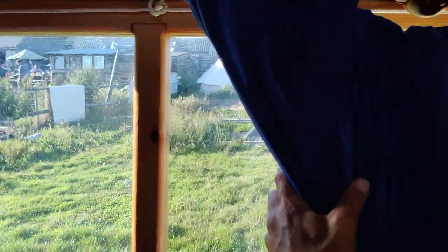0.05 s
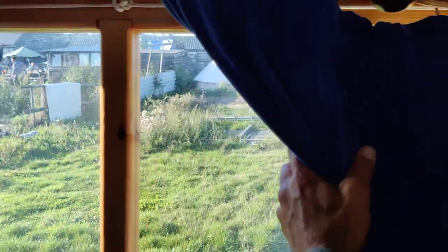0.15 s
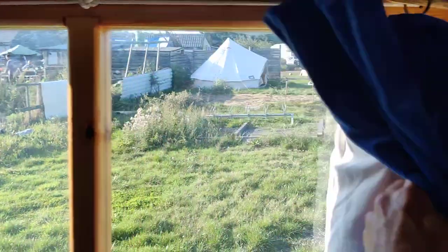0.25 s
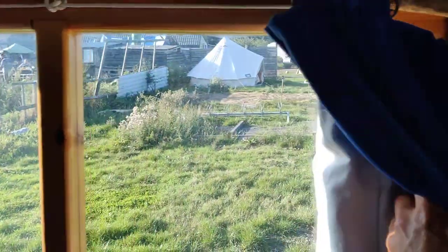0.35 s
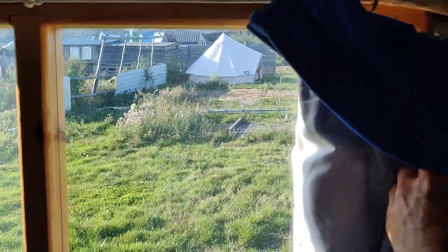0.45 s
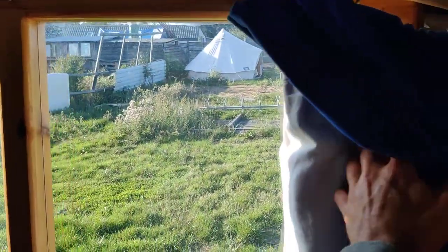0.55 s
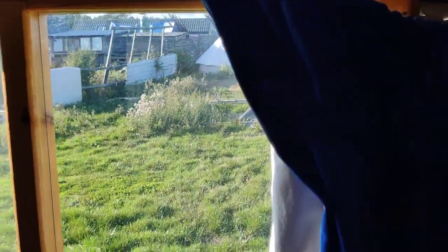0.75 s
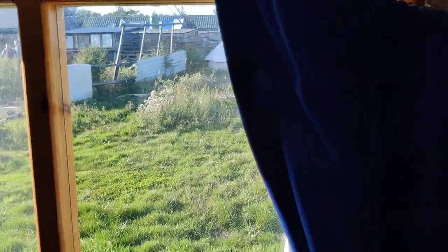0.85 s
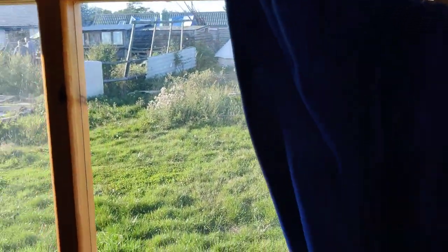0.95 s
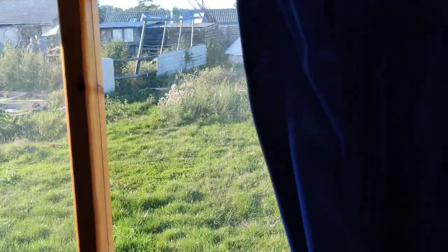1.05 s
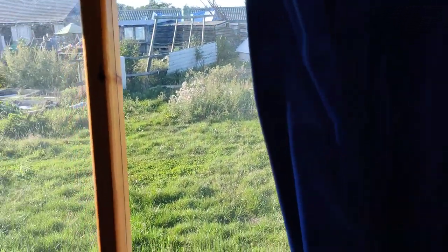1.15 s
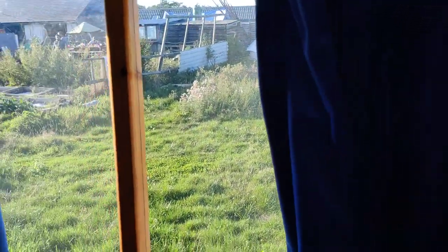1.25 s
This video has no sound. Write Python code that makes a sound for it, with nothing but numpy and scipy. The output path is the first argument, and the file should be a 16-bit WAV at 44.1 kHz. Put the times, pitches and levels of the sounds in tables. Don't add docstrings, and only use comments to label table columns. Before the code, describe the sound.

A curtain is tugged open, its metal hooks scraping and clashing sharply along a wooden pole

```python
import sys
import numpy as np
from scipy import signal
from scipy.fft import rfft, irfft
from scipy.io import wavfile
from scipy.ndimage import uniform_filter1d

SR = 44100
rng = np.random.default_rng(int(sys.argv[2]) if len(sys.argv) > 2 else 0)


def generate_wav(signal):
    frames = np.transpose(np.atleast_2d(signal))
    scaled = np.clip(frames, -1, 1) * 32767
    pcm = np.round(scaled).astype(np.int16)
    wavfile.write(sys.argv[1], SR, pcm)


def undo_db(level):
    steps = np.asarray(level, float) / 20
    return 10 ** steps


N = 57330

# frequency in Hz, level in dB, t60 in seconds.
HOOK_MODES = [(2157, -3, 0.016), (2876, -1, 0.011), (3123, -2.5, 0.011), (3570, 2, 0.016),
              (4042, -2.5, 0.017), (4470, -5.5, 0.016), (5440, -4, 0.016), (5870, -3, 0.0097),
              (6820, -2, 0.014), (7770, -9.5, 0.0043), (8500, -11, 0.018)]
# frequency in Hz, level in dB, t60 in seconds.
POLE_MODES = [(420, -2, 0.015), (701, -0.5, 0.027), (1069, -3, 0.035), (1244, -0.5, .025),
              (1460, -1.5, 0.028), (1802, 0, 0.011)]
# frequency in Hz, level in dB, t60 in seconds.
FRAME_MODES = [(40.3, -5.5, 0.091), (113, -6.5, 0.097), (137.7, -2, 0.14), (210, -10.5, 0.044),
               (436.7, 1, .06)]
BLOW_S = .05


def curve(table, index):
    rows = np.array(table, float)
    return undo_db(np.interp(np.arange(N) / SR, rows[:, 0], rows[:, index]))


def unit(x):
    return x / np.sqrt(np.mean(x ** 2))


def unit_energy(x):
    return x / np.sqrt(np.sum(x ** 2) / 2)


def colour(x, points):
    hz, db = np.array(points, float).T
    f_hz = np.maximum(np.arange(N // 2 + 1) * SR / N, 1)
    gain_db = np.interp(np.log(f_hz), np.log(hz), db, left=-60, right=-60)
    return unit(irfft(rfft(x) * undo_db(gain_db), N))


def walk(rate_hz):
    k = int(SR / rate_hz)
    steps = np.repeat(rng.standard_normal(N // k + 1), k)
    return unit(uniform_filter1d(uniform_filter1d(steps, k), k)[:N])


def ring(hz, t60_s, t, turn_rad=0):
    return np.sin(2 * np.pi * hz * t + turn_rad) * np.exp(-np.log(1000) * t / np.maximum(t60_s, .002))


def strike(modes, scatter_db, spread_rad, seconds=.12, contact_s=.0003, jitter=0.028):
    hz, db, t60_s = np.array(modes, float).T[:, :, None]
    chance = rng.standard_normal((4, len(modes), 1))
    t = np.arange(int(seconds * SR)) / SR
    gain = undo_db(db + scatter_db * chance[0])
    f_hz = np.minimum(hz * (1 + jitter * chance[1]), .45 * SR)
    turns_rad = spread_rad * np.minimum(hz / 1100, 1) ** 2 * chance[2:]
    ports = np.array([np.sum(gain * ring(f_hz, t60_s, t, turn), axis=0) for turn in turns_rad])
    return ports * np.minimum(t / contact_s, 1) ** 2


def add(out, x, start_s):
    i = max(int(start_s * SR), 0)
    n = min(x.shape[-1], N - i)
    out[:, i:i + n] += x[:, :n]


def pan(db):
    return undo_db(np.array([[db / 2], [-db / 2]]))


def still_air():
    # frequency in Hz, level in dB per Hz.
    air_spectrum = [(40, -9), (100, 4.5), (156, -7), (452, -24), (705, -25), (872, -33), (12100, -46),
                    (15000, -56.5)]
    noise = rng.standard_normal((2, N)) + 0.57 * rng.standard_normal(N)
    return undo_db(-76) * np.array([colour(port, air_spectrum) for port in noise])


def cloth():
    # time in seconds, rustle in dB, L-R in dB.
    cloth_motion = [(0, -90, -2.5), (.095, -81.5, 10.5), (.112, -66, -9), (.14, -77.5, 8), (.208, -68, 6),
                    (.232, -53, 11), (.37, -53, 1), (.41, -64, 0.5), (.52, -72, 2), (.68, -74.5, 3.5),
                    (.8, -71, 3), (.89, -73.5, 2.5), (.925, -75.5, 4), (.96, -82.5, 1), (1.1, -89, 0),
                    (1.255, -89, -1), (1.272, -81.5, 3), (1.3, -80.5, -6)]
    # frequency in Hz, level in dB per Hz.
    rustle_spectrum = [(210, -35.5), (350, -8), (438, -7.5), (593, -2.5), (1180, -8), (1280, -5),
                       (1380, -9), (4520, -12.5), (16000, -25.5)]
    mid, side = rng.standard_normal((2, N))
    sign = np.array([[1], [-1]])
    fibres = 1 + 2.8 * (rng.random(N) < .01)
    hiss = colour(mid * fibres, rustle_spectrum) + 0.98 * sign * colour(side * fibres, rustle_spectrum)
    hiss = hiss * undo_db(1.1 * walk(28) + 3.0)
    return hiss * curve(cloth_motion, index=1) * curve(cloth_motion, index=2) ** (sign / 2)


def rumble():
    # time in seconds, level in dB, L-R in dB.
    sway_motion = [(0.0, -67, 4), (0.166, -51.5, 3.5), (0.238, -35.5, 3.5), (0.314, -34, 6), (0.34, -39, 4),
                   (0.372, -34.5, -5), (0.39, -34, 2), (0.44, -40, 0.5), (0.514, -48.5, -3),
                   (0.662, -48.5, -3), (0.814, -51.5, -2), (0.84, -52.5, 3), (0.904, -53.5, -0.5),
                   (1.028, -60.5, -2.5), (1.136, -62, 4.5), (1.222, -69.5, 2), (1.27, -52.5, 3),
                   (1.3, -56, 3)]
    # frequency in Hz, level in dB per Hz.
    rumble_spectrum = [(12, -26.5), (20, 1), (52, 0), (105, -15.5), (203, -22.5), (437, -30), (500, -31),
                       (650, -48.5), (1100, -120)]
    mid, side = rng.standard_normal((2, N))
    sign = np.array([[1], [-1]])
    deep = (colour(mid, rumble_spectrum) + 0.069 * sign * colour(side, rumble_spectrum)) * undo_db(-0.86)
    return deep * curve(sway_motion, index=1) * curve(sway_motion, index=2) ** (sign / 2)


def drag(slip_rate_hz=2000.0):
    # start in seconds, end in seconds, level in dB.
    drag_stages = [
        (.074, .104, -79),
        (.104, .113, -64),
        (.113, .127, -57),
        (.127, .218, -59),
        (.219, .25, -46),
        (.25, .372, -41),
        (.372, .39, -56),
    ]
    edge_s = .005
    t = np.arange(N) / SR
    effort = sum(undo_db(db) * (t > start_s) * (t <= end_s) for start_s, end_s, db in drag_stages)
    effort = uniform_filter1d(effort, int(edge_s * SR))

    chance = rng.random((3, N))
    slips = (chance[0] < slip_rate_hz / SR) * undo_db(-3. * np.log(chance[1] + .02)) * np.sign(chance[2] - .5)
    slips = unit(slips) * undo_db(3.0 * walk(90)) * effort

    t_body = t[:int(.12 * SR)]
    wood = unit_energy(strike(POLE_MODES, 3.2, 1.0) * np.exp(-t_body / 0.0019))
    metal = unit_energy(strike(HOOK_MODES, 2., 1.3) * np.exp(-t_body / 0.00051))
    frame = unit_energy(strike(FRAME_MODES, 2., .3))
    body = wood + undo_db(-15.0) * metal + undo_db(1.5) * frame
    return signal.fftconvolve(slips[None], body, axes=1)[:, :N] * pan(2.0)


def room(x):
    t60_s, level_db, dull_hz = 0.095, -17, 2900
    t = np.arange(int(.3 * SR)) / SR
    tail = rng.standard_normal((2, len(t))) * np.exp(-np.log(1000) * t / t60_s) * np.minimum(t / 0.001, 1)
    tail = signal.lfilter(*signal.butter(1, dull_hz, fs=SR), tail)
    tail = tail / np.sqrt(np.sum(tail[0] ** 2))
    return undo_db(level_db) * signal.fftconvolve(x.mean(axis=0)[None], tail, axes=1)[:, :N]


def tugs():
    # start in seconds, level in dB.
    tug_events = [
        (0.076, -63.5),
        (.118, -43.5),
        (.222, -33.5),
        (0.233, -32.5),
        (0.263, -27),
        (.298, -29),
        (0.367, -38),
        (1.261, -76),
    ]
    out = np.zeros((2, N))
    for start_s, db in tug_events:
        add(out, undo_db(db) * strike(FRAME_MODES, 6.2, .25, seconds=0.39), start_s)
    return uniform_filter1d(out, size=30) * pan(3.1)


def blows(count=3):
    # start in seconds, peak in dB, brightness in dB per octave, wire ring in dB, pole knock in dB.
    clash_events = [(0.253, -15.5, -6, -23, 1), (.2560, -18, -6.5, -22, -3), (.2676, -20, -2.5, -13.5, 4.5),
                    (.2708, -28, -2, -17, 6), (0.2766, -21.5, -3, -13, 5.5), (.2800, -26, -3.5, -17.5, 5),
                    (0.287, -27, 0, -15.5, 4.5), (0.2888, -24, 1, -16, 3.5), (0.2932, -28, -1, -17, 9),
                    (0.302, -10, 2, -20, -13.5), (0.3031, -11, 0.5, -26, -12.5),
                    (.3070, -12.5, 1, -28, -10.5), (0.3117, -21, -3.5, -21.5, 3.5),
                    (0.3239, -14.5, 0, -2, -3), (.3250, -11, 2.5, 0, -5.5), (.3290, -12.5, 2.5, 3, -5.5),
                    (0.334, -18, -2, 0.5, -5), (0.3348, -14.5, 2, -3, -4), (.3415, -26, -2.5, -11, 1.5),
                    (.3460, -20.5, -4.5, -18, -1.5), (.3520, -27, -2.5, -14, 2),
                    (0.3597, -17.5, 3.5, -4.5, -9), (0.3629, -23, -4.5, -10.5, -2),
                    (0.3671, -25.5, -2, -12.5, 0)]
    # frequency in Hz, level in dB, t60 in seconds.
    wire_modes = [(10200, -15.5, 0.027), (11480, -0.5, 0.014), (11600, -3, 0.012), (12100, 2, 0.012),
                  (13500, -6.5, 0.0066), (14800, -10.5, .006)]
    rebound_s, rebound_db, noise_decay_s = .0024, -7.3, 0.00098
    t = np.arange(int(BLOW_S * SR)) / SR
    out = np.zeros((2, N))
    for start_s, db, tilt_db, wire_db, pole_db in clash_events:
        tilted_hook = [(hz, g + tilt_db * np.log2(hz / 3500), t60_s) for hz, g, t60_s in HOOK_MODES]
        for k in range(count):
            hook = strike(tilted_hook, 3.7, 1.5, seconds=BLOW_S) * pan(-2.1)
            wire = strike(wire_modes, 1.7, .8, seconds=BLOW_S, jitter=0.0093) * pan(-2.8)
            pole = strike(POLE_MODES, 3.2, 1.2, seconds=BLOW_S) * pan(-4.0)
            noise_db = 1.4 * tilt_db - (6.5 if k == 0 else 15.)
            noise = rng.standard_normal((2, len(t))) * np.exp(-t / noise_decay_s)
            x = hook + undo_db(wire_db) * wire + undo_db(pole_db) * pole + undo_db(noise_db) * noise
            delay_s = rebound_s * (k - 0.56 * rng.random()) * (k > 0) / 2
            add(out, x * undo_db(db - 11.0 + rebound_db * (k > 0)), start_s + delay_s)
    return out


def cracks():
    # start in seconds, peak in dB.
    crack_events = [(.2537, -18), (0.2681, -23), (0.2776, -18.5), (0.3014, -4), (0.3254, -8),
                    (0.3267, -11.5), (0.3367, -14), (.3607, -20)]
    t = np.arange(int(BLOW_S * SR)) / SR
    out = np.zeros((2, N))
    for start_s, db in crack_events:
        grit = 0.31 * rng.standard_normal(len(t)) * np.exp(-t / .0005)
        crack = grit - ring(5120, 0.0012, t)
        add(out, undo_db(db - 3.0) * crack * pan(3.5), start_s)
    return out


def singing_ring():
    # start in seconds, level in dB.
    ring_events = [(0.2893, -25.5), (0.306, -18.5), (0.3275, -9), (0.331, -16.5), (0.3357, -14),
                   (0.3376, -13.5), (.3550, -29.5)]
    # frequency in Hz, level in dB, t60 in seconds.
    ring_modes = [(3974, 1, .018), (4252, -3, 0.015)]
    out = np.zeros((2, N))
    for start_s, db in ring_events:
        x = strike(ring_modes, 0.5, 0.35, seconds=BLOW_S, contact_s=0.0011, jitter=.006)
        add(out, undo_db(db - 4.0) * x * pan(4.8), start_s)
    return out


def clashes():
    shade_hz, port_lag_s, pan_db = 7500, .00025, 5
    near, far = blows() + cracks() + singing_ring()
    far = signal.lfilter(*signal.butter(1, shade_hz, fs=SR), far)
    far = np.roll(far, int(port_lag_s * SR))
    return np.array([near, far]) * pan(pan_db)


def ticks():
    # start in seconds, peak in dB, pitch in Hz, wood in dB, top ring in dB.
    tick_events = [(.3900, -47, 3000, -6, -14), (.4088, -44, 2950, -3, -18), (.4238, -43, 3000, -2, -16),
                   (.4377, -43, 3080, -2, -15), (.4535, -43, 3150, -2, -16), (.4732, -44, 2940, 0, -18),
                   (.5001, -44, 3110, 0, -17), (.6977, -50, 2950, -8, -22), (.773, -57, 1300, -3, -24),
                   (.803, -58, 1300, 2, -24), (.9480, -54.5, 3830, -16, -5)]
    # frequency in Hz, level in dB, t60 in seconds.
    tick_body = [(450, -5, 0.017), (1010, -15.5, 0.013), (1594, -10.5, 0.0083), (2234, -12.5, 0.012)]
    t60_s, top_hz, pan_db = 0.0075, 6740, -2
    flick_s, flick_db = .5128, -56
    out = np.zeros((2, N))
    for start_s, db, hz, wood_db, top_db in tick_events:
        twin_hz = hz * 1.13 if hz < 3500 else hz / 1.31
        metal_modes = [(hz, 0, t60_s), (twin_hz, -7, t60_s), (top_hz, top_db, t60_s)]
        metal = strike(metal_modes, 1., .2, seconds=.05, contact_s=.0017, jitter=.004)
        wood = strike(tick_body, 1., .5, seconds=.05, contact_s=.002)
        add(out, undo_db(db + 13.5) * (metal + undo_db(wood_db) * wood), start_s - .0006)
    burst = rng.standard_normal(300) * np.exp(-np.arange(300) / SR / .0008)
    flick = signal.lfilter(*signal.butter(2, 4000, "high", fs=SR), burst)
    add(out, undo_db(flick_db + 1) * np.array([flick, flick]), flick_s)
    return out * pan(pan_db)


def scrape():
    peak_s, rise_s, fall_s, level_db, band_hz = .893, .06, .015, -68, (1200, 6000)
    t = np.arange(N) / SR - peak_s
    grains = rng.standard_normal((2, N)) * (1 + 3. * (rng.random(N) < .02))
    band = signal.lfilter(*signal.butter(1, band_hz, "band", fs=SR), grains)
    swell = np.exp(-np.where(t < 0, -t / rise_s, (t / fall_s / 2) ** 2))
    return undo_db(level_db) * unit(band) * swell


def scene():
    hooks = drag() + clashes()
    rocking = ticks()
    echo = room(hooks + undo_db(0.5) * rocking)
    return still_air() + cloth() + rumble() + hooks + rocking + echo + tugs() + scrape()


def low_pass(x):
    return signal.sosfilt(signal.butter(12, 16800, fs=SR, output="sos"), x)


def record(dry):
    top_cut = signal.ellip(8, .2, 60, 15800, fs=SR, output="sos")
    mix = signal.sosfilt(top_cut, dry)
    return low_pass(mix)


dry = scene()
out = record(dry)
generate_wav(out)
```